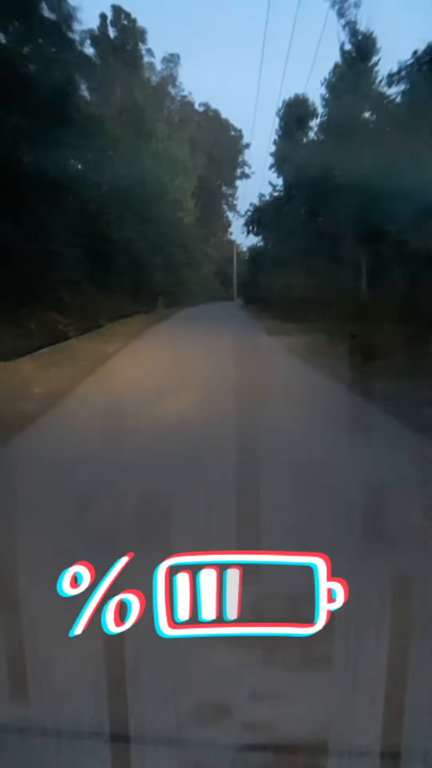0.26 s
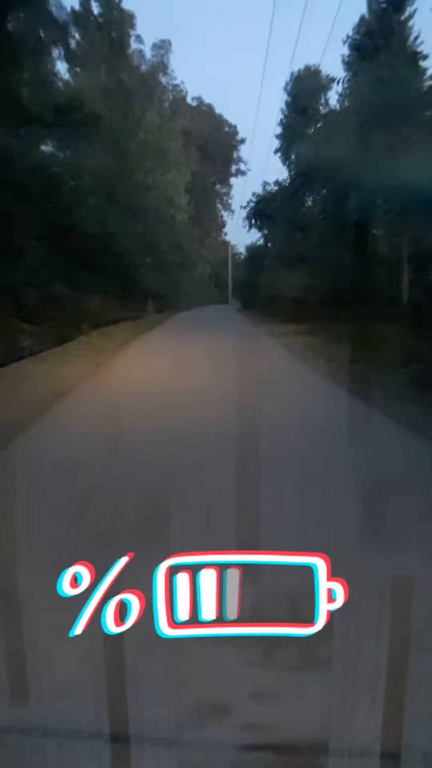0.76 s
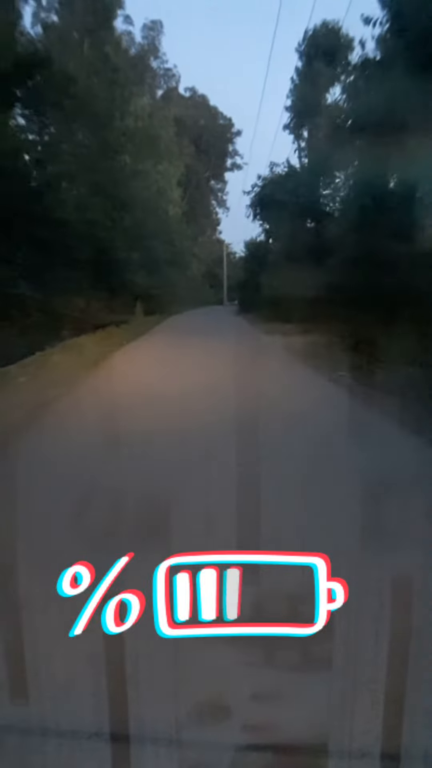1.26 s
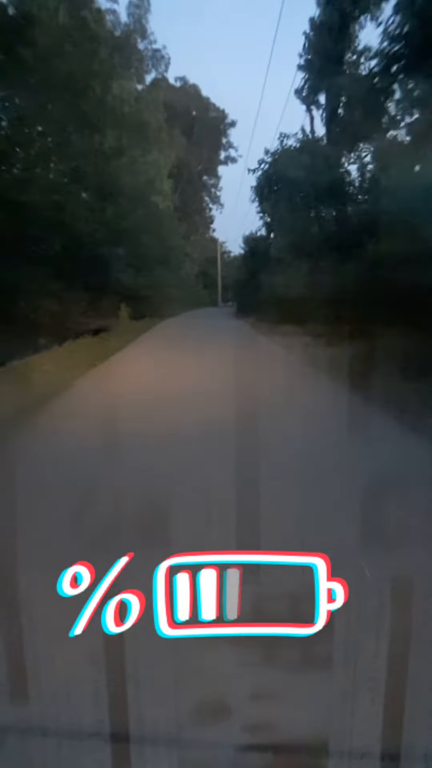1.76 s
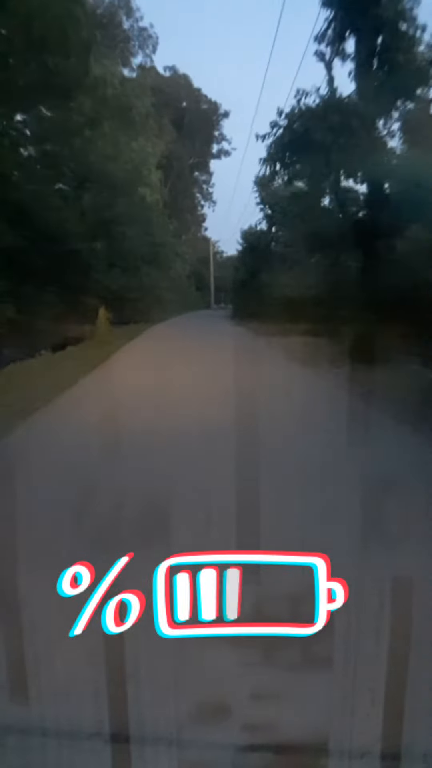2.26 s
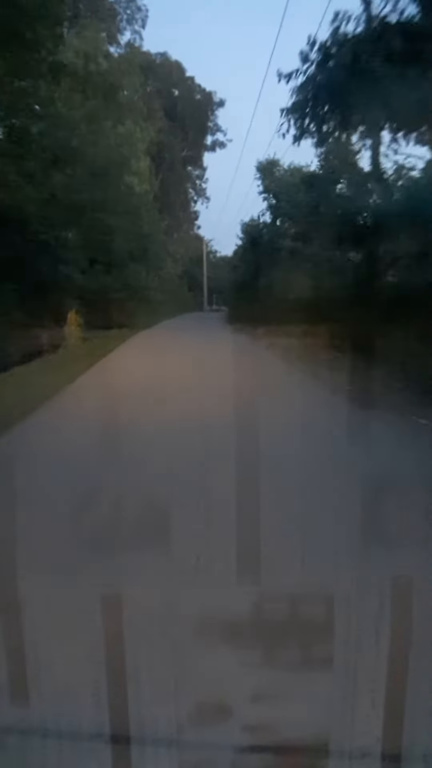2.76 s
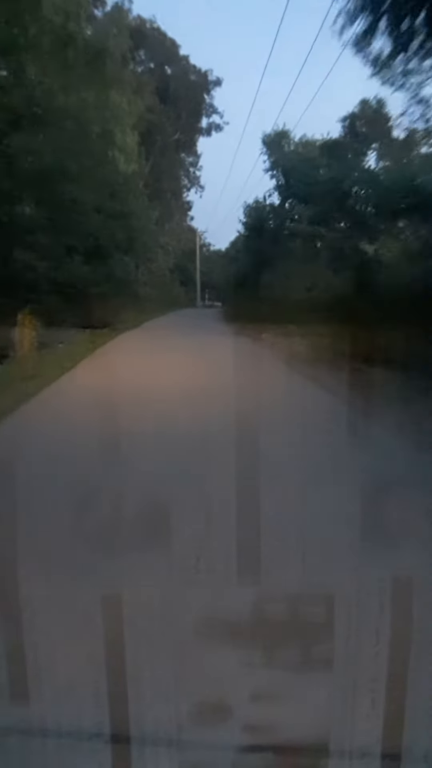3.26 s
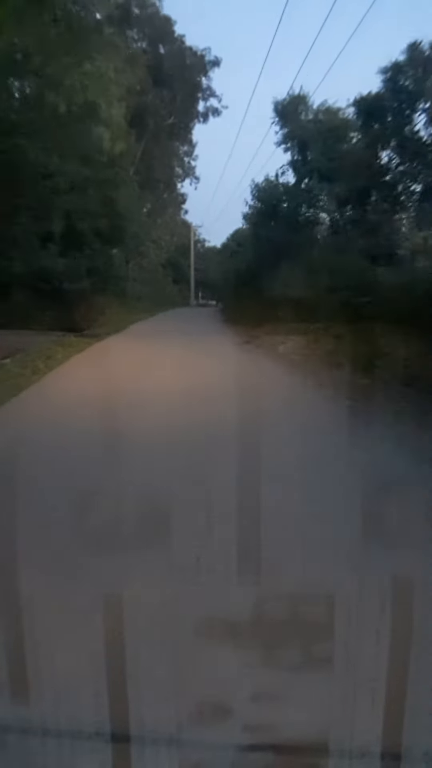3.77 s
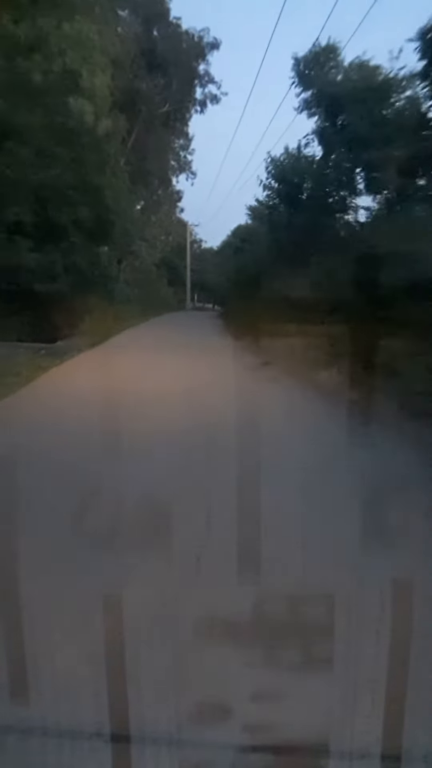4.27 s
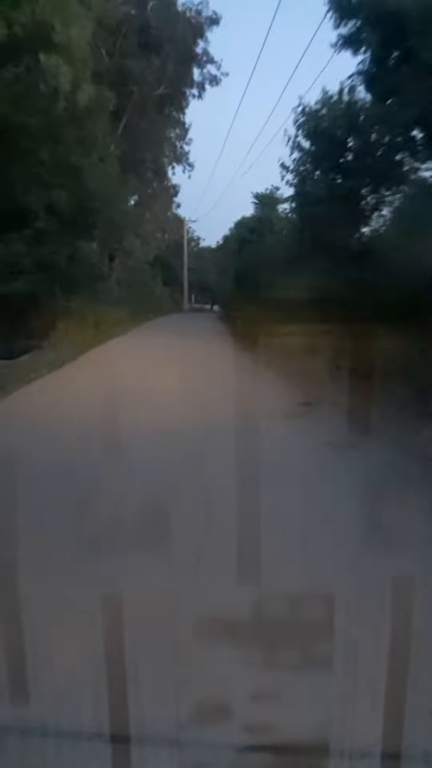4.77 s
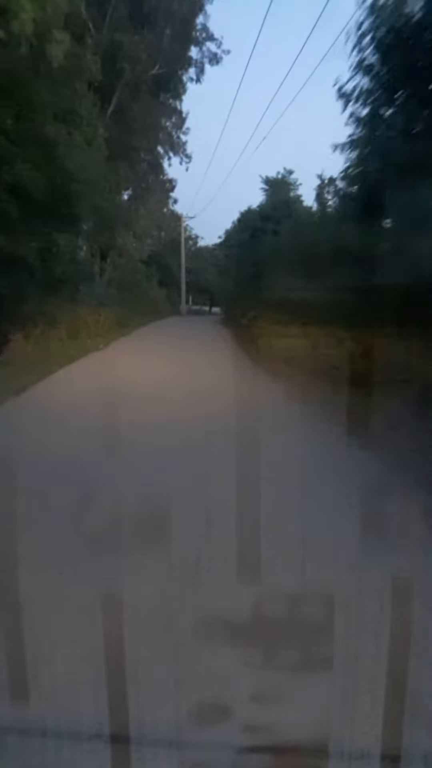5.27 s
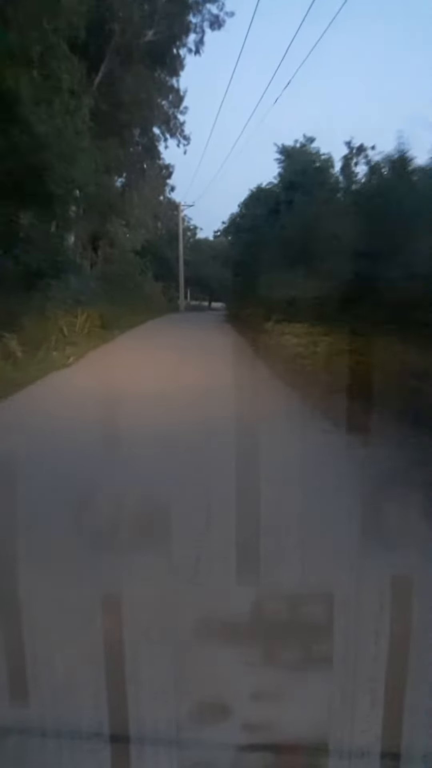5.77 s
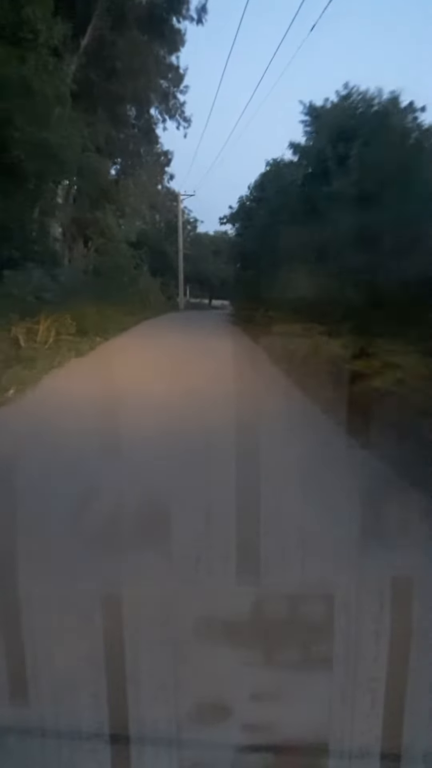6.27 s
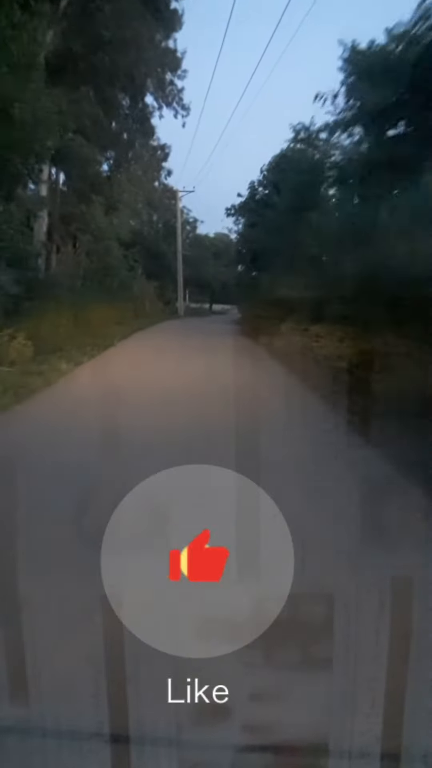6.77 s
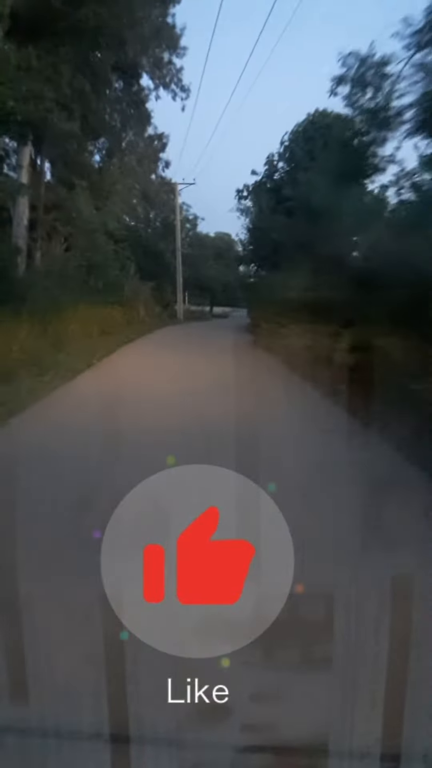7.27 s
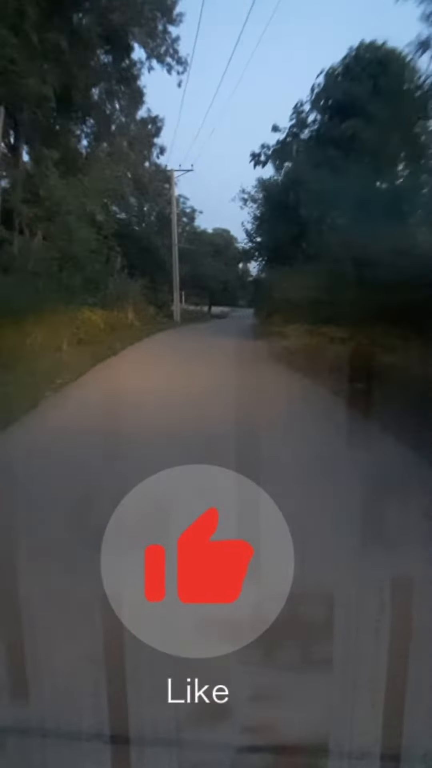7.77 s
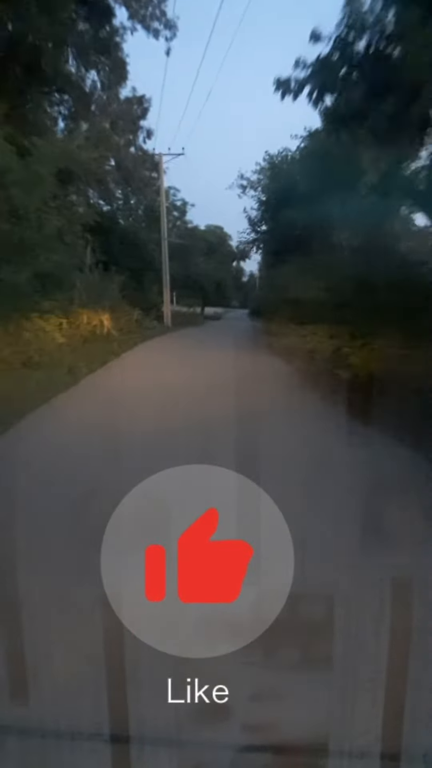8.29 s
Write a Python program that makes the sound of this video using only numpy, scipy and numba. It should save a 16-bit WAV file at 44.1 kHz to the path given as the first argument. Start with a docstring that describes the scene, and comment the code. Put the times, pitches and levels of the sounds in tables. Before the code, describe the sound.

Inside a small vehicle on a country road, a phone in its loose holder picks up dense, thudding rattle. A motorbike passes with a short raspy hiss in the first second; then hard knocks and crisp clicks continue over road rumble, air and low engine hum. The ride calms around three seconds, roughens after four, eases near six, then roughens again with little metallic squeaks. Left side is covered and boomy, right more open and thinner.

```python
"""A loose phone mount knocks in a small motor vehicle on a country road, heard from the phone it holds.
Knocks are filtered blows spread into short chirps: strong at the covered left microphone through the phone's
body, fainter and later at the open right one. Snaps are bright clicks, and filtered taps and noise tremble on the left.
A motorbike passes the other way as filtered noise with a sweeping echo; sine partials make engine hum and squeaks.
Shaped noise makes scrapes, road roar, a body boom and air, and the phone's limiter ducks the mix around hard knocks."""
import sys
import numpy as np
from scipy import signal
from scipy.fft import rfft, irfft, next_fast_len
from scipy.io import wavfile
from scipy.ndimage import uniform_filter1d, minimum_filter1d, map_coordinates
from numba import njit

SR = 44100
rng = np.random.default_rng(int(sys.argv[2]) if len(sys.argv) > 2 else 0)


def wav_out(sig):
    """Save sig, one row per channel (or a flat mono array), as 16-bit PCM at SR to the path in sys.argv[1]."""
    wavfile.write(sys.argv[1], SR, np.round(np.clip(np.atleast_2d(sig).T, -1, 1) * 32767).astype(np.int16))


N = 376173
TIME = np.arange(N) / SR

# resonances of the cab and its panels: (frequency [Hz], width [Hz], gain [dB])
CAB_MODES = [(173, 15, 2), (358, 72, 6.5), (415, 22, 6), (638, 27, 6), (902, 68, -3), (1235, 170, 4),
             (2376, 79, 3.5), (2785, 17, 4.5), (3184, 30, 7.5), (3810, 27, 7), (3920, 40, 3.5),
             (4450, 200, 3)]


def undb(db):
    """Decibels to gain."""
    return 10 ** (np.asarray(db) / 20)


def unit(x):
    """Scale to rms 1."""
    return x / np.sqrt(np.mean(x ** 2))


def curves(table):
    """Each column of a timed table, sample by sample."""
    s, *columns = np.transpose(table)
    return [np.interp(TIME, s, column) for column in columns]


def bins(size):
    """Frequencies of a real spectrum in Hz."""
    return np.arange(size // 2 + 1) * SR / size


def shape(points, f):
    """Gain of a spectrum at the frequencies f, interpolated in dB over log frequency."""
    hz, db = np.transpose(points)
    return undb(np.interp(np.log(f + 1), np.log(hz), db))


def colour(x, points, modes=()):
    """Filter by a spectrum and a set of resonances."""
    size = next_fast_len(N + 4096)
    f = bins(size)
    modes_db = sum(db / (1 + (2 * (f - hz) / width) ** 2) for hz, width, db in modes)
    return irfft(rfft(x, size) * shape(points, f) * undb(modes_db), size)[:N]


def noise():
    """White noise."""
    return rng.standard_normal(N)


def walk(rate):
    """Smooth random curve of spread near 1, with rate new values a second."""
    k = max(int(SR / rate), 2)
    steps = np.repeat(rng.standard_normal(N // k + 1), k)
    return 1.3 * uniform_filter1d(uniform_filter1d(steps, k), k)[:N]


def grains(rate, spread_db):
    """Random impulses, about rate a second, mostly small and a few large."""
    hits = rng.random(N) < rate / SR
    sizes = undb(spread_db * np.minimum(rng.exponential(size=N), 4))
    return hits * sizes * rng.choice([-1, 1], N)


def add(out, x, s):
    """Mix x into out, starting at s seconds."""
    i = int(round(s * SR))
    a, b = max(i, 0), min(i + x.shape[-1], N)
    if b > a:
        out[..., a:b] += x[..., a - i:b - i]


def bending(f, spread_s=0.003474, centre_hz=550, front_hz=1250):
    """Bending waves run faster the higher they are, up to a limit: a sharp front, then a short falling chirp."""
    wave_hz = np.clip(f, 1, front_hz)
    return 1j * np.exp(-2j * np.pi * spread_s * (np.sqrt(centre_hz / wave_hz) * (f + wave_hz) - f))


def knocks(rows, pivot_hz=400, spread_s=0.003427, scatter=0.044, graze_db=-18, graze_s=0.00186,
           lag_s=0.00026, crunch_db=-9, crunch_s=0.002, ripple_db=1.42, ripple_octaves=1.26, size=2048):
    """Blows of the mount pass through the casing to the left port and, fainter and later, to the right."""
    # the way through the casing and the way through the air: (frequency [Hz], gain [dB])
    body_points = [(25, -49), (45, -32), (90, -17), (130, -2), (250, 1), (420, 1.5), (550, 0.5), (700, -2),
                   (1000, -11), (2000, -29), (3000, -45.5), (7000, -72)]
    air_points = [(60, -56), (200, -23.5), (400, -27), (650, -15.5), (1000, -24), (1500, -26.5),
                  (3000, -64), (7000, -80)]
    out, f = np.zeros((2, N)), bins(size)
    lead = size // 4  # room ahead of the blow for its early parts
    octaves = np.log2(np.clip(f, 100, 1500) / pivot_hz)
    body = shape(body_points, f)
    airborne = shape(air_points, f) * np.exp(-2j * np.pi * f * lag_s)
    paths = np.array([body, airborne])
    # rough faces crunch for a few milliseconds as they meet
    rough = np.exp(-np.arange(size) / SR / crunch_s) * np.sqrt(2 / (crunch_s * SR))
    crisp = undb(crunch_db) * shape([(500, -16), (1500, 11.0), (3000, 15)], f)
    for (s, db, hardness), (place, force, early) in zip(rows, rng.random((len(rows), 3))):
        # the parts graze just before they meet fully, mostly very faintly
        graze = 2 * force ** 6 * undb(graze_db) * np.exp(2j * np.pi * f * graze_s * (.5 + early))
        crunch = crisp * rfft(rough * rng.standard_normal(size))
        blow = undb(hardness * octaves) + graze + crunch
        blow = blow * bending(f, spread_s * (1 + scatter * (2 * place - 1)))
        # the place of the blow favours some of the casing's broad resonances over others
        blow = blow * undb(ripple_db * np.cos(2 * np.pi * (octaves / ripple_octaves + place)))
        peak = np.abs(irfft(blow * body)).max()
        knock = np.roll(irfft(blow * paths), lead, axis=-1)
        add(out, knock * undb(db) / peak, s - lead / SR)
    return out


def taps(coarse_db, per_s=4.8, level_db=-24.5, spread_db=5, rise=0.9, hardness=-2.2):
    """Light blows at random moments, stronger on a coarse road: rows (s, peak dB, hardness dB per octave)."""
    rows = []
    for when, strength, hard in rng.random((int(per_s * N / SR), 3)):
        i = int(when * N)
        peak_db = level_db + rise * coarse_db[i] + spread_db * (2 * strength - 1)
        rows.append((i / SR, peak_db, hardness * (.5 + hard)))
    return rows


def snaps(decay_s=0.0015, snap_db=3.0, resonance_db=5, resonance_octaves=0.26, left_db=-21,
          splinter_db=-7, ring_s=0.004, ring_db=-22, size=2048):
    """Hard parts meet, mostly on the open side: a click, a splintery noise tail and a faint longer ring."""
    # (time [s], relative strength [dB], brightness [dB per octave], resonance of the struck part [Hz])
    snap_rows = [(1.2694, -6, -1, 4000), (1.5362, -18, 0, 2300), (1.7578, -12, 2.5, 5050),
                 (2.282, -18.5, -1, 3000), (2.6008, -20, -1, 2200), (2.67, -10, 2, 4000),
                 (2.703, -24, 1, 4800), (2.7377, -20, -0.5, 3000), (2.798, -21.5, -3.5, 3500),
                 (3.597, -26.5, -1.5, 4500), (4.4702, -21, -3, 6000), (4.6248, -4.5, 0, 5300),
                 (4.724, -6, -1, 5250), (4.942, -30, 3, 5000), (5.0148, -22, 2, 5200),
                 (5.4708, -7, -1, 3200)]
    # spectrum of a snap: (frequency [Hz], gain [dB])
    snap_points = [(500, -19), (2000, 17), (3300, 9), (4800, 11.5), (6200, -2), (9000, -14.5), (12500, -10),
                   (15500, -13)]
    out, t, f = np.zeros((2, N)), np.arange(size) / SR, bins(size)
    lead = size // 4
    octaves = np.log2(np.maximum(f, 1000) / 4000)
    decay = np.exp(-t / decay_s) + undb(ring_db) * np.exp(-t / ring_s)
    for s, db, brightness, hz in snap_rows:
        part_db = resonance_db * np.exp(-(np.log2((f + 1) / hz) / resonance_octaves) ** 2)
        tail = rng.standard_normal((2, size)) * decay
        tail = tail / np.linalg.norm(tail, axis=1, keepdims=True)
        crack = 1 + undb(splinter_db) * rfft(tail)
        crack = crack * shape(snap_points, f) * undb(db + snap_db + part_db + brightness * octaves)
        add(out, np.roll(irfft(crack), lead, axis=-1), s - lead / SR)
    return out * undb([[left_db], [0]])


def chatter(shake_db, rate=130, spread_db=4.5, bed_db=-5):
    """The mount keeps trembling under the knocks: dense tiny taps, chirped by bending waves, over a rumble."""
    # spectrum of the trembling: (frequency [Hz], gain [dB])
    shake_points = [(25, -42), (50, -25), (85, 2.5), (130, 1), (240, -4), (400, -13.5), (700, -12.5),
                    (1000, -18.5), (1250, -25.5), (2000, -31.5), (4500, -53), (8000, -62)]
    size = next_fast_len(N)
    tiny_taps = irfft(rfft(grains(rate, spread_db), size) * bending(bins(size)), size)[:N]
    tremble = unit(tiny_taps) + undb(bed_db) * noise()
    return unit(colour(tremble, shake_points)) * undb(shake_db)


def motorbike(nearest_s=0.553, coming_s=0.12, going_s=0.17, peak_db=-25, falloff=1.46, rough_db=2.0,
              grit_db=-5, mirror=0.18, mirror_lag_s=0.00091, recede_db=-38, recede_s=0.68):
    """An oncoming bike rasps past, its level set by distance; a road echo combs the hiss with a moving lag."""
    # spectrum of the rasp: (frequency [Hz], gain [dB])
    bike_points = [(300, -7), (700, 2), (1400, -2.5), (1950, 7.5), (2700, -3.5), (4900, -4), (6000, -17.5),
                   (8800, -39), (12500, -25.5), (15500, -34.5)]
    pace_s = np.where(TIME < nearest_s, coming_s, going_s)
    distance = np.hypot(1, (TIME - nearest_s) / pace_s)  # 1 at the nearest point
    roughness = undb(rough_db * walk(72.0))
    rasp = colour((noise() + undb(grit_db) * unit(grains(900, 4.2))) * roughness, bike_points)
    # the way over the road surface lags most when the bike is nearest
    echo = map_coordinates(rasp, [(TIME - mirror_lag_s / distance) * SR], mode="mirror")
    front = unit(rasp + mirror * echo) * undb(peak_db) / distance ** falloff
    # a thinner hiss swells and fades just behind the bike
    thin_points = [(2000, -21), (4200, -1.5), (5000, 2.0), (6000, -11), (9000, -29)]
    behind = unit(colour(noise() * roughness, thin_points))
    return front + behind * undb(recede_db) * np.exp(-((TIME - recede_s) / 0.11) ** 2)


def bike_core(middle_s=0.565, half_length_s=0.0732, peak_db=-28, doppler=0.05):
    """While the bike is alongside, a narrow rasp stands out and sinks in pitch by the Doppler effect."""
    # spectrum of the narrow rasp: (frequency [Hz], gain [dB])
    core_points = [(900, -42), (1600, -10), (1920, -4), (2250, -14), (2750, -7.5), (3200, -20),
                   (3750, -10.5), (5500, -47)]
    along = (TIME - middle_s) / half_length_s
    position = np.cumsum(1 - doppler * np.tanh(along))  # read fast while coming, slowly while going
    rasp = map_coordinates(unit(colour(noise(), core_points)), [position], mode="mirror")
    return rasp * undb(peak_db) * np.exp(-along ** 2)


def engine(start_hz=42.82, settle_s=1.8, cruise_hz=46.93, wander=.004, flutter_db=2.2):
    """Hum on orders of a firing rate that climbs ever more slowly; each order wavers a little in level."""
    # engine orders: (multiple of the firing rate, relative level [dB])
    engine_orders = [(1, -7), (2, 1), (4, -9), (5, -14), (8, -15)]
    # level of the hum: (time [s], level [dB])
    hum_levels = [(0, -32.5), (0.6, -34), (1.2, -34.5), (2.2, -38), (3.5, -41.5), (4.0, -35), (4.5, -31),
                  (4.85, -41), (6.4, -42.5), (6.8, -31), (7.3, -35.5), (8.53, -37.5)]
    hz = cruise_hz - (cruise_hz - start_hz) * np.exp(-TIME / settle_s)
    phase = 2 * np.pi * np.cumsum(hz * (1 + wander * walk(6))) / SR
    hum = np.zeros(N)
    for k, order_db in engine_orders:
        level = undb(order_db + flutter_db * walk(11))
        hum += level * np.sin(k * phase + 2 * np.pi * rng.random())
    return unit(hum) * undb(curves(hum_levels)[0])


def squeaks(third_db=-16, rough_db=3.0, jitter=.004):
    """A rubbing metal part sings in short gliding notes of three partials, uneven in pitch and level."""
    # (middle [s], half length [s], pitch [Hz], glide [Hz per s], level [dB], upper partials [dB])
    squeak_notes = [(6.555, .04, 1930, -200, -40, -5), (7.11, .025, 1985, -400, -40, -8),
                    (7.437, .03, 1985, -900, -38, -3), (7.474, .03, 1910, -300, -35.5, -16),
                    (7.513, .03, 1985, -1200, -36.5, -3), (7.543, .028, 1980, -500, -34.5, 1),
                    (7.574, .021, 1975, -900, -35, 2), (7.61, .025, 1995, 200, -41, -3),
                    (7.65, 0.026, 2000, 600, -39.5, 0)]
    out = np.zeros(N)
    for s, half_length, hz, glide, db, upper_db in squeak_notes:
        t = np.arange(int(half_length * SR * 2)) / SR
        pitch = (hz + glide * (t - half_length)) * (1 + jitter * walk(330)[:len(t)])
        phase = 2 * np.pi * np.cumsum(pitch) / SR
        upper = np.sin(2 * phase) + undb(third_db) * np.sin(3 * phase)
        tone = (np.sin(phase) + undb(upper_db) * upper) * undb(rough_db * walk(197)[:len(t)])
        add(out, unit(tone) * np.hanning(len(t)) * undb(db), s - half_length)
    return out


def scuffs(grit_db=0):
    """A loose panel scrapes for an instant: gritty filtered noise in short bell-shaped swells."""
    # (middle [s], half length [s], level [dB])
    scrape_rows = [(1.452, .012, -34), (2.018, 0.017, -36.5), (4.274, 0.017, -29.5), (4.387, 0.011, -38.5),
                   (4.463, 0.02, -35), (6.643, 0.015, -31), (6.902, 0.037, -37)]
    # spectrum of a scrape: (frequency [Hz], gain [dB])
    scrape_points = [(600, -16), (1300, 5), (2000, 1.5), (2500, 1.5), (3200, -3), (4800, -13), (7000, -41)]
    rub = unit(colour(noise() + undb(grit_db) * unit(grains(800, 3.5)), scrape_points))
    swells = sum(undb(db) * np.exp(-((TIME - s) / half_length) ** 2) for s, half_length, db in scrape_rows)
    return rub * swells


def road(roar_db, jolt_db=1.5):
    """Tyres on rough asphalt boom in the cab: unsteady noise through its resonances."""
    # spectrum of the roar: (frequency [Hz], gain [dB])
    roar_points = [(25, -16.5), (45, -10), (70, 4), (130, -1.5), (220, 0), (310, -7), (500, -7.5),
                   (700, -8.5), (900, -10.5), (1500, -21), (4000, -62.5)]
    return unit(colour(noise() * undb(jolt_db * walk(22)), roar_points, CAB_MODES)) * undb(roar_db)


def boom(middle_s=4.17, half_length_s=0.22, peak_db=-35):
    """An uneven stretch of road makes the whole body boom: one swell of low noise."""
    # spectrum of the boom: (frequency [Hz], gain [dB])
    boom_points = [(25, -21), (42, -4), (65, 5), (110, -7), (200, -23), (500, -66)]
    return unit(colour(noise(), boom_points)) * undb(peak_db) * np.exp(-((TIME - middle_s) / half_length_s) ** 2)


def air(air_db, flicker_db=0.58, grit_db=-7, gust_db=0.1161):
    """Air and tyre hiss with a fine rattle of the panels; the louder it is, the more it comes in gusts."""
    # spectrum of the hiss: (frequency [Hz], gain [dB])
    air_points = [(400, -13), (900, -7), (1250, 2), (1900, 0.5), (2700, -4.5), (3800, -7), (4700, -10),
                  (5500, -20.5), (7000, -29), (9000, -42.5), (10500, -38.5), (12500, -32.5), (15500, -43)]
    gusts = gust_db * (air_db - air_db.min()) * walk(60)  # gust_db is per dB above the calmest level
    rush = noise() + undb(grit_db) * unit(grains(700, 3.3))
    rush = rush * undb(flicker_db * walk(35) + gusts)
    return unit(colour(rush, air_points, CAB_MODES)) * undb(air_db)


def scene():
    """Road coarseness drives roar, air, trembling and light taps; the covered left port muffles the cab."""
    # the clearest knocks of the mount: (time [s], peak [dB], hardness [dB per octave])
    clear_knocks = [(0.0489, -4.5, -4.5), (0.1113, -2.5, -4), (0.1867, -10, -6.5), (0.2118, -1.5, -1),
                    (0.2739, -11, -4.5), (0.3055, -15, -5), (0.3204, -4, -5.5), (0.3524, -4.5, -4.5),
                    (0.4194, -7, -5), (0.4645, -5, -2), (0.4966, -10, -5), (0.536, -10.5, -7),
                    (0.6081, -6.5, -1), (0.6635, -11.5, -1.5), (0.6868, -13, 0.5), (0.8416, -16.5, -1.5),
                    (0.8976, -10, -3.5), (0.939, -15, -1), (0.9684, -11.5, -6), (1.006, -13.5, -2),
                    (1.0378, -1.5, -3.5), (1.075, -13.5, -9), (1.103, -9, -7), (1.1771, -8.5, -7),
                    (1.2392, -10, -2), (1.2681, 12.5, 1.5), (1.3096, -0.5, 0), (1.4435, -11.5, -5.5),
                    (1.463, -10, -9), (1.5345, -4.5, -6.5), (1.5575, -16, -1), (1.6086, -6.5, -2),
                    (1.7574, 7, -2.5), (1.7945, -8, -5), (1.8165, 4, -3.0), (1.8369, -6.5, -3.5),
                    (1.9189, -8.5, -5), (1.9788, 0.5, -4), (2.0386, -14.5, -5), (2.0483, -18, -1),
                    (2.2097, -8, -4), (2.2804, 4.5, -2.5), (2.3176, -9.5, -4.5), (2.3407, -15.5, -4.5),
                    (2.5013, -11.5, -5), (2.5708, -10, -6), (2.6015, -5.5, -1.5), (2.6699, 5.5, 0),
                    (2.7029, -9, -4.5), (2.7372, -4.5, -6.5), (2.7982, -4, -3.5), (2.8975, -5.5, -1.5),
                    (2.95, -10.5, -1), (3.0586, -15, -4.5), (3.0798, -20, -1), (3.1022, -24, -2),
                    (3.1326, -10, -5), (3.142, -13.5, -4), (3.187, -12.5, -4), (3.2038, -8.5, -3.5),
                    (3.2499, -20, -4.5), (3.3562, -13.5, -5), (3.4893, -4.5, -1), (3.507, -7, -3.5),
                    (3.5399, -16.5, -0.5), (3.5953, -4, -0.5), (3.6133, -18.5, -0.5), (3.6579, -10.5, 0.5),
                    (3.7211, -10, -2), (3.7447, -14, -1), (3.7951, -10.5, -1.5), (3.8485, -16, -3),
                    (4.0431, -5.5, -0.5), (4.1467, -13, 0), (4.1722, -7.5, 0), (4.3614, -16, -6),
                    (4.3871, -8.5, -3), (4.4968, 3.5, -2), (4.558, -1.5, -1.5), (4.5678, -14.5, -5),
                    (4.6237, 7, 1), (4.7243, 9, -0.5), (4.7571, -9.5, -3.5), (4.7821, -7, -5),
                    (4.942, -3.5, -0.5), (5.0142, -1, 0), (5.1054, -5, -1.5), (5.1686, -20.5, 0),
                    (5.2143, -16, -4), (5.2319, -4, -2.5), (5.302, -16, -2), (5.3293, -7, -3.5),
                    (5.369, -17.5, 2), (5.4, -1.5, -1.5), (5.4704, 5, 1), (5.5256, -15, -5),
                    (5.6657, -21.5, -0.5), (5.6841, -9.5, -5.5), (5.75, -14, -4), (5.7919, -23.5, 1),
                    (5.8414, -15.5, 0), (5.9188, -16, -6), (6.0049, -7.5, -4.5), (6.091, -16.5, -2),
                    (6.1472, -19, -6), (6.1949, -14, -5), (6.2176, -12.5, -7.5), (6.5013, -18, -1),
                    (6.5225, -12.5, -1.5), (6.581, -5, -4.5), (6.6015, -8, -5), (6.6148, -17, -2.5),
                    (6.6696, -8.5, -5), (6.7064, -14, 3), (6.7652, -6, -1.5), (6.8981, -10.5, -5),
                    (6.997, 7.5, 0), (7.0093, -10, -1), (7.0307, 1.5, -1.5), (7.0548, -3.5, -5),
                    (7.2098, -17.5, -3.5), (7.3685, -6.5, -9.5), (7.3846, -6, 2), (7.4766, -13, -5.5),
                    (7.4947, -3.5, -2.5), (7.5311, -9.5, -5.5), (7.7266, -16, -3.5), (7.8546, -9, -4),
                    (7.8815, 4, -2), (7.9178, -8.5, -6.5), (7.9834, -18.5, -6.5), (8.1229, -13, -7.5),
                    (8.1328, -16.5, 0), (8.1921, -7, -3.5), (8.2087, -13, -4.5), (8.2357, -4.5, -4),
                    (8.2858, -12, -3.5), (8.2991, -16, 6), (8.472, -10.5, -8), (8.485, -13, 1)]
    # coarseness of the road: (time [s], tyre noise above that on the smoothest asphalt [dB])
    surface = [(0, 7), (1.05, 7), (1.22, 10), (1.5, 6.5), (2.0, 5.0), (2.25, 3), (3.05, 0.5), (3.8, 0.5),
               (4.0, 5), (4.36, 9), (4.47, 9), (4.53, 7.5), (4.85, 2.5), (5.85, 0.0), (6.15, 3.5),
               (6.55, 3.5), (6.92, 9.5), (7.12, 7), (8.53, 6.0)]
    # muffling of the covered port: (frequency [Hz], gain [dB])
    covered_port = [(40, 1), (90, -2), (200, -1.5), (1200, -9.5), (2000, -21), (4500, -26.5), (8000, -28.5),
                    (15000, -4)]
    coarse_db = curves(surface)[0]
    # level on smooth asphalt, plus the rise for each dB of coarseness
    roar_db = -37 + 0.99 * coarse_db
    air_db = -42 + 1.02 * coarse_db
    shake_db = -39 + coarse_db
    cab = motorbike() + bike_core() + engine() + squeaks() + scuffs() + road(roar_db) + boom() + air(air_db)
    # sound in the cab is only partly alike at the two ports, and less so the higher it is
    diffuse = colour(road(roar_db) + air(air_db) + motorbike(), [(50, -18), (200, -6.0), (1500, 1.0)])
    direct = colour(cab, [(60, -1.5), (200, 0.5), (1500, -10.5)])
    left = colour(direct + diffuse, covered_port) + chatter(shake_db)
    return np.array([left, cab]) + snaps() + knocks(clear_knocks) + knocks(taps(coarse_db))


@njit
def follow(x, release):
    """Peak follower: jumps up at once and sinks slowly."""
    y, e = np.empty(len(x)), 0.
    for i in range(len(x)):
        e = max(x[i], e * release)
        y[i] = e
    return y


def record(dry, release_s=0.024, window_s=0.013, low_cut_hz=33, ceiling=.99, knee=3.86, top_hz=15600):
    """The phone weakens the deepest bass, softly limits both channels together and cuts the top."""
    low_cut = [(.6 * low_cut_hz, -16), (low_cut_hz, -3), (0.92 * low_cut_hz, 0)]
    dry = np.array([colour(x, low_cut) for x in dry])
    peak = follow(np.abs(dry).max(axis=0), np.exp(-1 / (release_s * SR)))
    gain = (1 + (peak / ceiling) ** knee) ** (-1 / knee)
    # centred windows: the gain starts to sink a little ahead of each peak
    window = max(int(window_s * SR), 1)
    gain = uniform_filter1d(minimum_filter1d(gain, size=window), size=window)
    top_cut = signal.ellip(8, .2, 70, top_hz, fs=SR, output="sos")
    return signal.sosfilt(top_cut, dry * gain)


dry = scene()
out = record(dry)
wav_out(out)
```